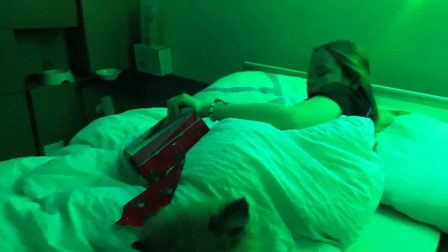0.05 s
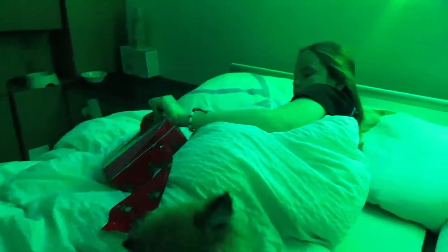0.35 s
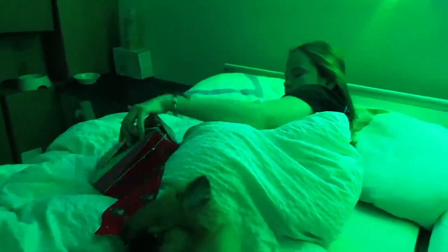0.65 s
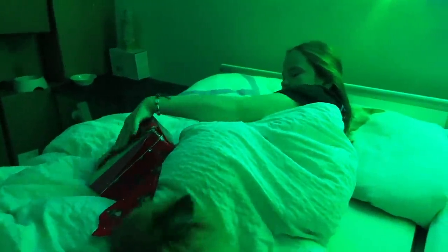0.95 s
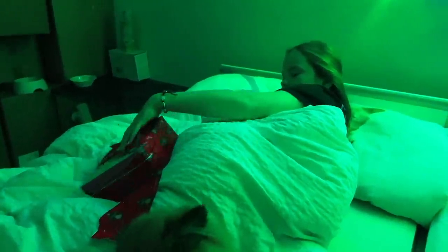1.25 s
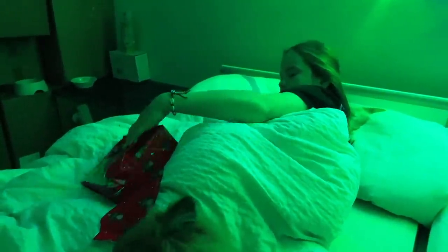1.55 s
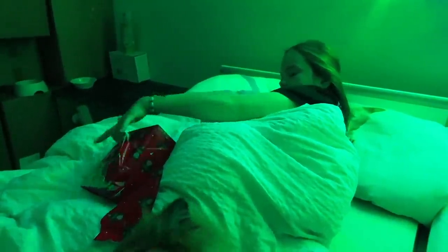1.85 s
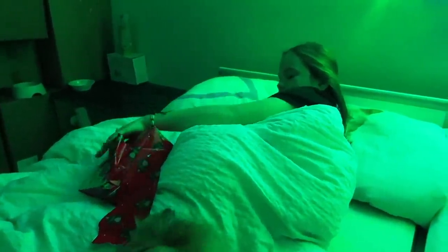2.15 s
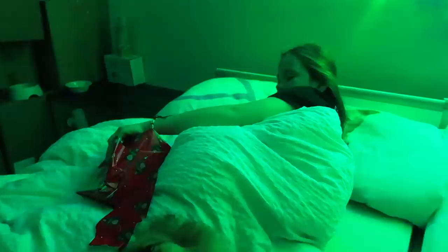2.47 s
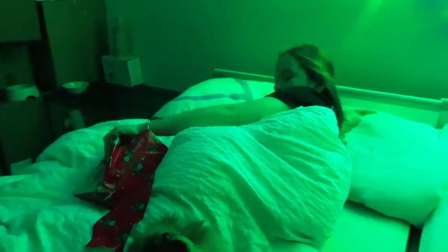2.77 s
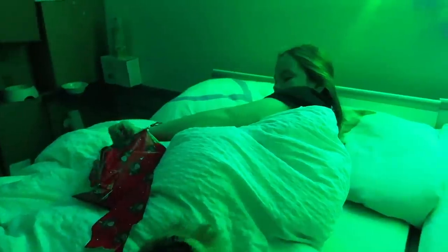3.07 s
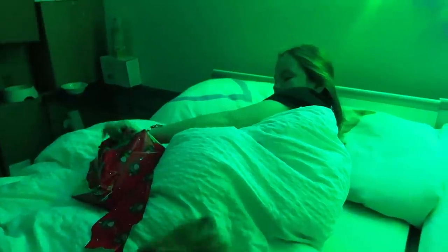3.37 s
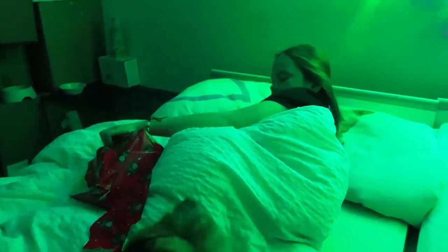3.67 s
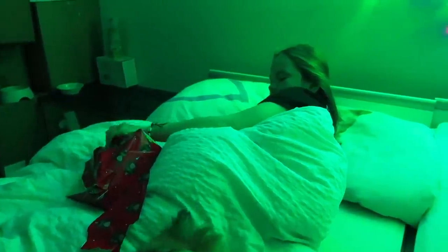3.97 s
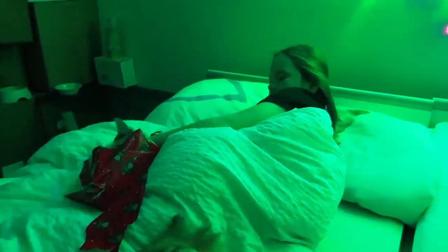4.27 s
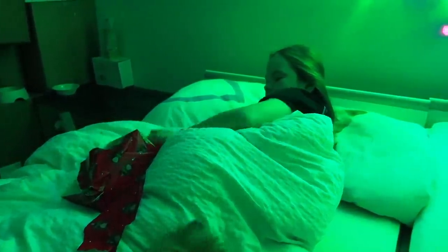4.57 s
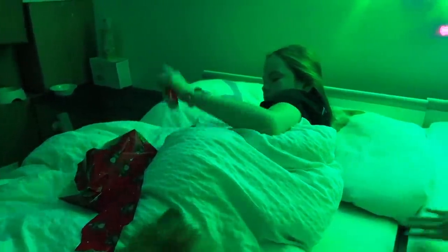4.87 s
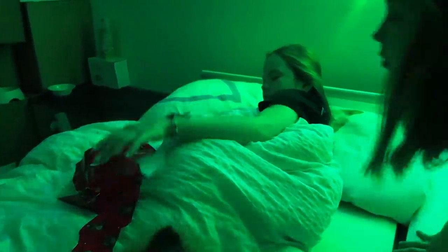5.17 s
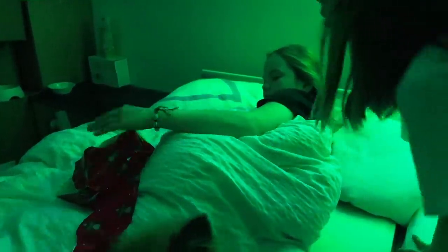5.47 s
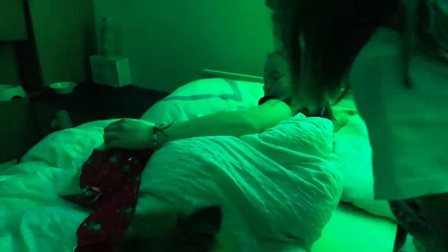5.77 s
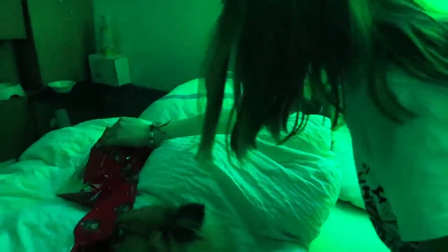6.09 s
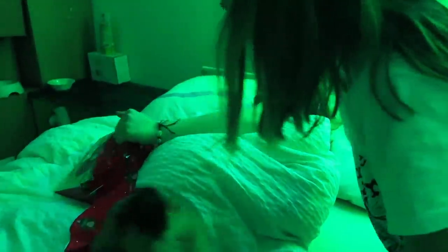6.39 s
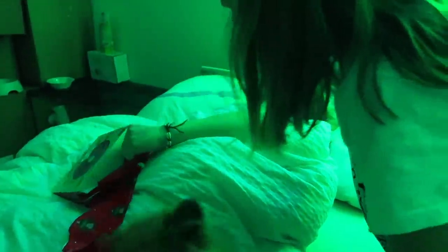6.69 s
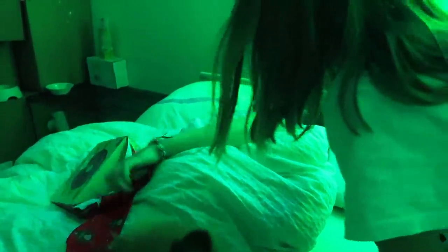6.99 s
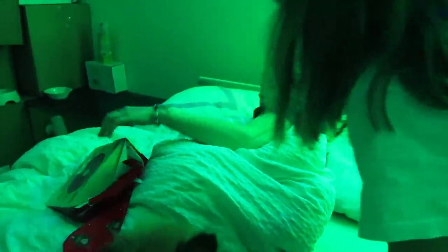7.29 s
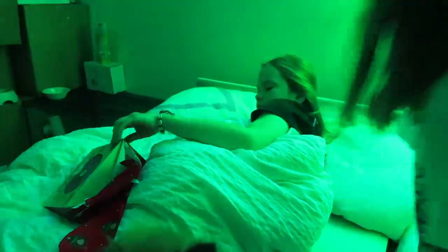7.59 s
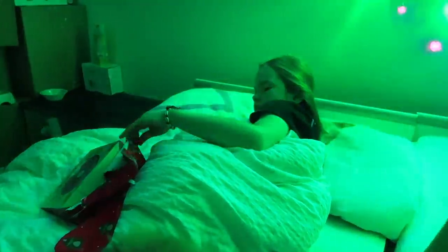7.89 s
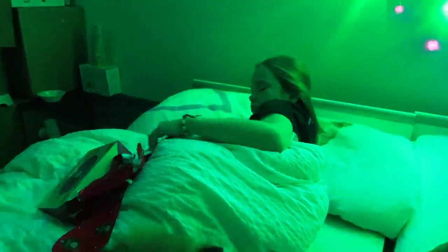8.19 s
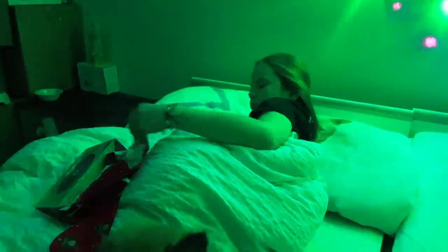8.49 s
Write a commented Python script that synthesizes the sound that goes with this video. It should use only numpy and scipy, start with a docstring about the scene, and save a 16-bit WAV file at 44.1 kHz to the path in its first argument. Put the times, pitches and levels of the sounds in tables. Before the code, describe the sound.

Someone unwraps a gift indoors, the paper tearing, crinkling and snapping in fits, with light cardboard knocks and softly shifting bedding.

```python
"""A bare-walled room, a cardboard gift box on the bed, a small stereo microphone a couple of metres off.
Wrapping paper is torn from the box: fibres break in dense crackles and sudden rips, and creases snap.
Fingers bump, scuff and drag over the hollow box, which rings, rumbles and groans.
The bedding shifts softly, and a quiet hiss lies under it all."""
import sys
import numpy as np
from scipy import signal
from scipy.fft import rfft, irfft, next_fast_len
from scipy.io import wavfile
from scipy.ndimage import uniform_filter1d

SR = 44100
rng = np.random.default_rng(int(sys.argv[2]) if len(sys.argv) > 2 else 0)


def bounce(signal):
    """Save signal as a 16-bit WAV file at the path given by the first command-line argument."""
    frames = np.transpose(np.atleast_2d(signal))
    limited = np.clip(frames, -1, 1)
    pcm = np.round(limited * 32767).astype(np.int16)
    wavfile.write(sys.argv[1], SR, pcm)


N = 381465
TIME = np.arange(N) / SR

# the hand pulls or crumples the paper; a slack sheet has more low mids, a taut one more treble:
# (start [s], length [s], relative level [dB], swell [dB], low-mid weight [dB], treble weight [dB])
PULLS = [(0.0, .012, -36.5, -8, 0, -7), (0.088, 0.046, -28, -16, -1.5, 3.5),
         (0.187, 0.024, -31, -3.5, -16, -1), (0.25, 0.21, -40.5, -7.5, -4.5, -3.5),
         (0.529, 0.1, -45.5, 1, -5, -12), (0.73, 0.18, -54, -0.5, -9, -9), (0.912, 0.062, -49, 7, -2, -2.5),
         (1.128, 0.18, -39.5, -5, -11, -4.5), (1.318, 0.18, -42, 5, -4.5, -7.5),
         (1.659, 0.042, -48, 2, -0.5, -6.5), (1.908, 0.4, -52, -0.5, -1.5, -9),
         (2.413, 0.21, -49, -4.5, -2.5, -6), (2.634, 0.2, -45.5, 4.5, -0.5, -4),
         (2.797, 0.049, -35.5, 13, -6.5, -2.5), (3.043, 0.041, -27, -10, -5, 1),
         (3.209, 0.1, -44, 2, -22, -3.5), (3.493, 0.045, -45, -5, -0.5, -11.5),
         (3.594, 0.14, -44, -7, -1.5, -13), (3.83, 0.11, -50.5, -1, -0.5, -14),
         (3.947, 0.13, -45.5, 1, -4, -6.5), (4.161, 0.22, -42.5, 7.5, -14, -5),
         (4.335, 0.17, -33.5, 0.5, -2.5, -2.5), (4.533, 0.12, -31, -5.5, -4.5, -5.5),
         (4.789, 0.016, -50.5, -4, 2, -5), (5.206, 0.27, -56.5, 1.5, -9, -5.5),
         (5.526, 0.2, -54.5, -0.5, -4, -8), (5.73, 0.11, -56.5, -1, 4, 3.5),
         (5.836, 0.031, -42, 5, -1.5, -6), (5.919, 0.13, -40.5, -1, -6, -6.5),
         (6.099, 0.21, -39, -4.5, -5.5, -10), (6.325, 0.115, -36.5, 3.5, -3, -7),
         (6.499, 0.28, -37, -5.5, -4, -6.5), (6.805, .17, -40.5, -0.5, 0.5, -5),
         (7.06, 0.086, -59.5, 1, 0, -2.5), (7.532, 0.025, -51.5, 2, -1, -20),
         (7.763, 0.048, -41.5, -10.5, -5, -8), (7.859, 0.058, -44.5, 1, -1, -9.5),
         (7.966, 0.059, -46.5, -1.5, -4.5, -13), (8.104, 0.16, -33, -5, -2.5, -3),
         (8.344, 0.12, -56, 4, 1, -19), (8.461, 0.087, -47, 3.5, -3.5, -15),
         (8.585, .07, -50.5, 0, -8, -23)]
# spectrum of the paper: (frequency [Hz], gain [dB])
PAPER_COLOUR = [(47, -58), (80, -24.5), (119, 3), (199, 1), (361, -4), (404, 0), (687, -4.5), (734, -2),
                (1050, -5.5), (1140, -6), (1500, -6), (3030, -5.5), (11200, -21.5), (14600, -35),
                (16000, -72)]
# resonances of the hollow box: (frequency [Hz], width [Hz], gain [dB])
BOX_MODES = [(200, 28, -0.5), (287, 42, 4.5), (426, 25, 7), (530, 42, 3.5), (603, 28, 3.5), (740, 32, 3),
             (953, 68, -2), (1250, 37, -2), (1280, 28, -3)]


def from_db(db):
    """Decibels to gain."""
    return np.exp(np.asarray(db) * (np.log(10) / 20))


def rms_one(x):
    """Scale to unit power."""
    return x / np.sqrt(np.mean(x ** 2) + 1e-20)


def even(x, window_s):
    """Hold the short-term power at 1 and keep the grain."""
    x = rms_one(x)
    return x / np.sqrt(np.abs(uniform_filter1d(x ** 2, max(int(window_s * SR), 2))) + 1e-9)


def in_time(rows):
    """The columns of a curve table at every sample."""
    times, *columns = np.transpose(rows)
    return [np.interp(TIME, times, column) for column in columns]


def at_hz(points, hz):
    """Read a table on a log-frequency axis."""
    known, values = np.transpose(points)
    return np.interp(np.log(np.maximum(hz, 1)), np.log(known), values)


def band(x, edges_hz, kind, order=2):
    """Butterworth filter."""
    sos = signal.butter(order, np.clip(edges_hz, 10, SR * 9 / 20), kind, fs=SR, output="sos")
    return signal.sosfilt(sos, x + 1e-18)


def colour(x, spectrum, size=2048):
    """Causal (minimum-phase) filter with the given spectrum."""
    gains = from_db(at_hz(spectrum, np.fft.rfftfreq(size, 1 / SR)))
    cepstrum = irfft(np.log(gains))
    response = irfft(np.exp(rfft(np.r_[cepstrum[0], 2 * cepstrum[1:size // 2]], size)))
    return signal.oaconvolve(x, response)[:len(x)]


def resonance(x, hz, width_hz):
    """Two-pole resonance with gain 1 on top."""
    r = np.exp(-np.pi * width_hz / SR)
    feedback = [1, -2 * r * np.cos(2 * np.pi * hz / SR), r * r]
    return signal.lfilter(np.array([1, 0, -1]) * (1 - r * r) / 2, feedback, x + 1e-18)


def add(out, start_s, sound):
    """Mix a short sound in at a time."""
    start = max(int(start_s * SR), 0)
    out[start:start + len(sound)] += sound[:N - start]


def drift(per_s):
    """Random wander of spread 1."""
    knots = rng.standard_normal(int(per_s * N / SR) + 2)
    return rms_one(np.interp(TIME * per_s, np.arange(len(knots)), knots))


def clicks(per_s, spread_db):
    """Random clicks, many small and a few large."""
    sizes = from_db(spread_db * np.minimum(rng.exponential(1, N), 4)) * rng.choice([-1, 1], N)
    return sizes * (rng.random(N) < per_s / SR)


def movements(rows, attack_db_per_s, release_db_per_s, rest_db):
    """Level in dB of movements over a resting level: each builds up, swells or fades, then dies away."""
    power, ticks = from_db(rest_db) ** 2, TIME[::64]
    for start, length, level_db, swell_db in rows:
        age = ticks - start
        edges_db = attack_db_per_s * np.maximum(-age, 0) + release_db_per_s * np.maximum(age - length, 0)
        power = power + from_db(level_db + swell_db * np.clip(age / length, 0, 1) - edges_db) ** 2
    return np.interp(TIME, ticks, 10 * np.log10(power))


def pulling(weights_db=0, settling_db=-66):
    """Level in dB of the paper: softly gripped, then pulled, and settling between pulls."""
    grip_s, grip_db = 0.034, -17
    starts, lengths, levels_db, swells_db, *_ = np.transpose(PULLS)
    pulls = list(zip(starts, lengths, levels_db + weights_db, swells_db))
    grips = [(start - grip_s, grip_s, db + grip_db, 0) for start, _, db, _ in pulls]
    return movements(pulls + grips, attack_db_per_s=695, release_db_per_s=348, rest_db=settling_db)


def crackle(per_s, spread_db, facet_db, patchy_db, count=14):
    """Each breaking fibre clicks and briefly rings one facet; facets come and go as the sheet flexes."""
    breaks, facet_of_break = clicks(per_s, spread_db), rng.integers(0, count, N)
    facets = np.zeros(N)
    for k, hz in enumerate(np.geomspace(650, 11000, count)):
        ring = rms_one(resonance(breaks * (facet_of_break == k), hz, 0.25 * hz))
        facets += ring * np.sqrt(hz) * from_db(patchy_db * drift(per_s=16))
    grain = rms_one(breaks) + from_db(facet_db) * rms_one(facets)
    return even(colour(grain, PAPER_COLOUR), window_s=0.036)


def paper():
    """Harder pulling breaks more fibres a second; slack paper sounds dull, taut paper bright."""
    *_, low_weights, treble_weights = np.transpose(PULLS)
    level_db = pulling()
    low_db = pulling(low_weights, settling_db=-65.5)
    treble_db = pulling(treble_weights, settling_db=-69)
    breaks_per_s = 850 * from_db(0.3 * (level_db + 40))
    grain = crackle(breaks_per_s, spread_db=3.5, facet_db=-0.5, patchy_db=2.0)
    sliding = rms_one(colour(rng.standard_normal(N), PAPER_COLOUR))   # sheet hisses over sheet
    low = from_db(low_db) * rms_one(band(band(grain, 1120, "low", order=3), 97, "high"))
    mid = from_db(level_db - 2.0) * rms_one(band(grain, [1300, 5000], "band", order=3))
    treble = from_db(treble_db) * rms_one(band(grain + from_db(-2.5) * sliding, 4820, "high", order=3))
    catching = rms_one(from_db(2.4 * drift(per_s=110)))   # the tear catches and lets go in spurts
    return catching * (low + mid) + treble


def sheet_ring(x, flex_db=2.0):
    """A few papery resonances stand out of the crackle; they come and go as the sheet bends."""
    # resonances of the sheet on its box: (frequency [Hz], width [Hz], gain [dB])
    sheet_modes = [(745, 16, -11), (1170, 13, -11), (2140, 77, -3), (2573, 49, -5), (2750, 23, -23),
                   (3020, 35, -10), (3420, 55, -4), (3700, 50, -13)]
    return x + sum(from_db(db + flex_db * drift(per_s=12)) * resonance(x, hz, width)
                   for hz, width, db in sheet_modes)


def cardboard(x, modes):
    """Resonances of the hollow box, in parallel with alternating signs."""
    return sum((-1) ** k * from_db(db) * resonance(x, hz, width)
               for k, (hz, width, db) in enumerate(modes))


def tugs():
    """The paper tugs at the box, whose large panels rumble along."""
    # large panels, damped by the bed: (frequency [Hz], width [Hz], gain [dB])
    panel_modes = [(107.3, 9.4, -3.5), (131, 23, -4.5), (195.4, 13, -2), (299, 37, -13.5)]
    level_db = 1.01 * (pulling() + 31.5) - 44.5
    rumble = cardboard(clicks(per_s=500, spread_db=1.5), panel_modes)
    return from_db(level_db) * even(rumble, window_s=0.043)


def bedding():
    """Cloth rubs on cloth with a soft, dull rustle."""
    # arm and body shift the bedding: (start [s], length [s], relative level [dB], swell [dB])
    shifts = [(0.0, 0.018, -33, -15), (0.085, 0.054, -30, -9.5), (0.84, 0.2, -48, 0), (1.3, 0.2, -41, 8.5),
              (2.02, 0.64, -44.5, -4.5), (2.68, 0.36, -48.5, 9), (3.96, 0.71, -48, 5),
              (5.33, 0.74, -55, 9.5), (6.42, 0.6, -56, 6), (8.088, 0.19, -36.5, -8.5)]
    # spectrum of the cloth: (frequency [Hz], gain [dB])
    cloth_colour = [(35, -31), (60, -13), (120, 0), (190, 3.5), (263, -5), (334, 0.5), (400, -1), (525, 1),
                    (1200, -20.5), (1560, -30), (2640, -120)]
    level_db = movements(shifts, attack_db_per_s=398, release_db_per_s=131, rest_db=-58)
    rustle = colour(clicks(per_s=1500, spread_db=4.5), cloth_colour)
    return from_db(level_db - 1.0) * rms_one(rustle)


def snaps(gain_db, size=1024):
    """A crease flips with a sharp crack and the short ring of its facet; smaller aftershocks follow."""
    # snapping creases: (time [s], relative peak [dB], facet pitch [Hz], crack weight [dB])
    creases = [(0.036, -24, 5090, 3), (0.071, -9.5, 5750, -4), (0.1903, -23, 3400, -6),
               (0.198, -27, 2500, -8), (0.279, -34, 2300, -8), (0.562, -31, 1950, -16),
               (0.904, -34, 3790, -17), (0.911, -28, 2000, -3), (0.9433, -25, 4300, 5),
               (0.95, -23.5, 4130, -17), (0.969, -28, 5200, -10), (1.055, -30, 3670, 1),
               (1.114, -25.5, 1850, -14.5), (1.1345, -22, 3580, 5), (1.204, -27.5, 3300, -9),
               (1.232, -28, 1360, -17), (1.235, -30.5, 5200, -19), (1.238, -29, 1400, -12),
               (1.33, -30, 2030, -10), (1.425, -23, 3520, -23), (1.792, -30, 3560, -9),
               (1.973, -34, 2730, -11), (2.355, -34, 1780, -34), (2.382, -33.5, 2640, -26),
               (2.4133, -25.5, 4160, -20), (2.6316, -29, 3150, -3), (2.478, -33, 4900, -21),
               (2.7478, -26.5, 2550, -20), (2.7686, -17.5, 3560, -6), (2.8503, -16, 3140, -1),
               (2.855, -24, 2690, -4), (3.029, -24, 3550, -4), (3.0351, -11, 2130, 11),
               (3.228, -28, 1890, -15), (3.235, -24, 4970, -2), (3.615, -33, 2490, -15),
               (3.9297, -32, 3570, -7), (3.9554, -25.5, 2780, -10), (4.1777, -16, 2640, -2),
               (4.184, -25, 4030, -20), (4.343, -19, 3870, -6), (4.348, -17.5, 4200, 4),
               (4.386, -25, 3000, -10), (4.394, -25, 3100, -14), (4.455, -23, 3490, -12),
               (4.4764, -26, 3700, -10), (4.5378, -21.5, 1720, -6), (4.789, -33, 2500, -28),
               (5.0494, -40, 5330, -9), (5.228, -38.5, 3500, -10), (5.7254, -27.5, 2300, 3),
               (5.961, -28.5, 3800, -8), (5.978, -32, 6500, -3), (6.1402, -30, 3100, -12),
               (6.162, -28.5, 1700, -8), (6.231, -30, 1900, -14), (6.2685, -29, 1770, -17),
               (6.3055, -23, 3400, -11), (6.313, -29, 990, -15), (6.363, -35, 1900, -11),
               (6.413, -23, 1480, -6), (6.437, -32, 1400, -8), (6.548, -23, 2100, -11),
               (6.556, -31, 1950, -10), (6.5667, -21, 1920, -20), (6.58, -30, 3300, -21),
               (6.616, -32, 2070, -20), (6.641, -25.5, 3440, -14), (6.659, -24, 3180, -14),
               (6.68, -23.5, 3080, -13), (6.685, -28, 3500, -8), (6.7196, -20.5, 2860, -12),
               (6.767, -24, 3300, -7), (6.77, -22, 3380, -13), (6.786, -26, 3420, -15),
               (6.823, -22.5, 3380, -9), (6.83, -27, 3400, -6), (6.859, -27.5, 3500, -20),
               (6.8868, -20, 2630, -27), (6.9105, -23.5, 1370, -26), (6.92, -31, 1400, -25),
               (6.972, -22.5, 3000, -8), (6.9843, -26, 3270, -6), (7.536, -35.5, 1940, -23),
               (7.7585, -30, 4130, -1), (7.765, -28, 4930, -9), (7.861, -25, 3240, -28),
               (8.017, -42, 3000, -17), (8.068, -32, 2410, -18), (8.0984, -21, 3040, -10),
               (8.112, -22, 2900, -10), (8.137, -19, 2150, -13), (8.1708, -23, 2490, -4),
               (8.2569, -22.5, 2160, -3), (8.358, -36.5, 2840, -16), (8.531, -32, 4220, -8)]
    shocks_per_s, shock_db, shock_decay_s = 700, -10, 0.012
    out, age = np.zeros(N), TIME[:size]
    for start, peak_db, hz, crack_db in creases:
        flutter, chance = rng.uniform(-1, 1, (2, size))
        shocks = np.sign(flutter) * (np.abs(chance) < shocks_per_s / SR) * np.exp(-age / shock_decay_s)
        flip = (age == 0) + 0.45 * flutter * np.exp(-age / 0.0012) + from_db(shock_db) * shocks
        width_hz = 0.42 * hz
        facet = resonance(resonance(flip, hz, width_hz), hz, width_hz)
        crack = band(band(flip, [800, 7000], "band", order=1), 11200, "low")
        snap = facet + from_db(crack_db) * crack
        add(out, start + 0.0005, from_db(peak_db + gain_db) * snap / np.abs(snap).max())
    return out


def bumps(panel_gain_db, tap_gain_db, size=8192):
    """A fingertip taps sharply, knocks the whole box and sets one panel thumping."""
    # fingers bump the box:
    # (time [s], relative panel level [dB], pitch [Hz], ring t60 [s], relative tap peak [dB])
    knocks = [(0.071, -21, 740, 0.018, -30), (0.591, -44, 930, 0.04, -33), (1.2317, -27, 200, .03, -25),
              (1.331, -33, 520, .04, -26), (1.495, -23, 530, 0.057, -47), (1.635, -37, 758, 0.13, -34),
              (1.676, -24.5, 166, 0.032, -40), (2.232, -18.5, 138, 0.068, -38),
              (2.235, -27.5, 423, .05, -48), (2.521, -22.5, 602, 0.035, -44), (2.539, -28, 583, 0.044, -32),
              (2.561, -24.5, 550, 0.045, -34.5), (2.575, -32, 655, 0.05, -38), (2.598, -32, 557, 0.1, -39),
              (3.036, -26, 769, 0.07, -50), (4.059, -19, 137, 0.042, -50), (4.856, -27, 610, 0.011, -35.5),
              (5.3147, -23.5, 250, 0.016, -32.5), (5.314, -33, 490, 0.022, -42),
              (5.5963, -23, 109, 0.089, -32), (5.598, -33, 469, 0.084, -42), (5.601, -21, 196, 0.097, -39),
              (5.622, -31, 196, 0.047, -36), (5.831, -33, 131, 0.049, -28.5),
              (5.861, -33, 783, 0.074, -25.5), (6.04, -29, 432, .03, -35), (6.228, -32, 126, 0.044, -33.5),
              (8.09, -26, 330, 0.051, -45), (8.125, -30, 303, 0.094, -45)]
    out, age = np.zeros(N), TIME[:size]
    for start, panel_db, hz, t60, tap_db in knocks:
        beating_modes = np.sin(2 * np.pi * hz * age) + 0.18 * np.sin(2 * np.pi * 1.3 * hz * age)
        panel = beating_modes * from_db(-60 * age / t60) * (1 - np.exp(-2 * hz * age))
        touch = (age == 0) + 0.059 * rng.standard_normal(size) * np.exp(-age / 0.0054)
        tap = band(touch, [300, 1700], "band") + 1.2 * cardboard(touch, BOX_MODES)
        add(out, start, from_db(panel_db + panel_gain_db) * panel)
        add(out, start, from_db(tap_db + tap_gain_db) * tap / np.abs(tap).max())
    return band(out, 102, "high", order=3)


def scuffs(attack_s=0.0024, release_s=0.0089):
    """A fingertip skids in a short run of slips that ring the lid."""
    # skids on the lid: (start [s], length [s], level [dB])
    skids = [(0.075, 0.02, -28.5), (0.591, .013, -36), (0.615, 0.022, -45.5), (0.702, 0.016, -44.5),
             (0.737, .012, -52), (1.442, 0.015, -37), (1.967, 0.026, -51), (2.834, 0.041, -37),
             (3.042, 0.028, -36), (4.037, 0.056, -47), (8.067, .05, -41.5)]
    # resonances of the lid: (frequency [Hz], width [Hz], gain [dB])
    lid_modes = [(450, 110, -6.5), (723, 69, 1), (942, 99, 1), (1143, 110, -3), (1290, 120, -4)]
    out = np.zeros(N)
    slips = even(cardboard(clicks(per_s=700, spread_db=0.5), lid_modes), window_s=0.0205)
    for start, length, level_db in skids:
        age = TIME[:int((length + release_s) * SR)]
        contact = np.interp(age, [0, attack_s, length, age[-1]], [0, 1, 1, 0])
        add(out, start, from_db(level_db) * contact * slips[int(start * SR):][:len(age)])
    return out


def rips(attack_s=0.001, release_s=0.01):
    """The tear runs ahead in a sudden volley of breaking fibres and rings the freed flap."""
    # sudden rips: (start [s], length [s], level [dB], flap resonance [Hz])
    tears = [(0.077, 0.014, -24.5, 5800), (0.096, 0.012, -24, 2750), (0.181, 0.015, -33, 2340),
             (0.184, 0.018, -27.5, 3500), (2.832, 0.015, -29, 2360), (2.847, 0.016, -25.5, 5730),
             (3.042, 0.03, -31.5, 2140), (3.259, 0.04, -45, 3060), (3.261, 0.059, -38, 2150),
             (3.61, 0.029, -45, 2400), (4.333, 0.038, -36, 4050), (4.383, 0.014, -28.5, 3030),
             (4.444, 0.016, -30, 3500), (4.536, 0.027, -32, 3260), (4.628, .025, -41, 1820),
             (5.53, 0.025, -48, 2050), (6.302, 0.06, -36, 1150), (6.404, 0.049, -36.5, 1390),
             (6.507, 0.025, -32.5, 1500), (6.537, 0.044, -35, 1800), (8.086, 0.09, -33, 2930)]
    out = np.zeros(N)
    volley = crackle(per_s=2200, spread_db=4.5, facet_db=1.5, patchy_db=4.0)
    for start, length, level_db, hz in tears:
        age = TIME[:int((length + release_s) * SR)]
        fibres = volley[int(start * SR):][:len(age)]
        flap = rms_one(fibres + 2.4 * resonance(fibres, hz, 0.25 * hz))
        envelope = np.interp(age, [0, attack_s, length, age[-1]], [0, 1, 1, 0])
        add(out, start, from_db(level_db) * flap * envelope)
    return out


def drag():
    """Skin sticks and slips on the box and sets it droning."""
    # fingers drag over the box: (time [s], relative level [dB])
    stroke = [(1.106, -52), (1.12, -35), (1.208, -37.5), (1.236, -32), (1.256, -35), (1.358, -28),
              (1.384, -36), (1.42, -27), (1.488, -28.5), (1.62, -74)]
    level_db, = in_time(stroke)
    touching = np.interp(TIME, [1.06, 1.1, 1.58, 1.64], [0, 1, 1, 0])
    drone = cardboard(clicks(per_s=450, spread_db=5.0), BOX_MODES)
    return touching * from_db(level_db - 5.0) * even(drone, window_s=0.03)


def groan():
    """Nearly regular slips make the box groan under the fingers."""
    # the slipping locks onto one wall of the box: (time [s], slip rate [1/s], level [dB])
    slipping = [(1.25, 290, -68), (1.28, 334, -40), (1.325, 285, -34.5), (1.355, 297, -27),
                (1.38, 310, -36), (1.42, 200, -38), (1.46, 240, -55), (1.5, 280, -80)]
    per_s, level_db = in_time(slipping)
    slip_count = np.cumsum(per_s * from_db(0.243 * drift(per_s=90))) / SR
    slips = np.diff(np.floor(slip_count), prepend=0) * from_db(2.0 * drift(per_s=120))
    slips = band(slips, 320, "low")   # soft skin rounds each slip
    return from_db(level_db) * even(cardboard(slips, BOX_MODES), window_s=0.03)


def room_tail(size=32768, bands=9):
    """Diffuse reflections off the bare walls die at a rate of their own in every band; unit energy."""
    # decay of the room: (frequency [Hz], t60 [s])
    room_t60 = [(150, 0.29), (500, 0.13), (1400, 0.61), (4000, 0.55), (12000, 0.19)]
    age, edges = TIME[:size], np.geomspace(60, 18000, bands + 1)
    tail = np.zeros(size)
    for low, high in zip(edges, edges[1:]):
        t60 = at_hz(room_t60, np.sqrt(low * high))
        tail += band(rng.standard_normal(size), [low, high], "band") * from_db(-60 * age / t60)
    tail *= np.clip(age / 0.0021, 0, 1) * (1 + 1.08 * np.exp(-age / 0.032))   # the near wall comes first
    return tail / np.sqrt(np.sum(tail ** 2))


def in_room(x, wet_db, side_direct_db, spots):
    """Direct sound and reflections, as the sum and the difference of the two microphone capsules."""
    wet, reflections = from_db(wet_db), np.zeros((2, N))
    spot = (TIME * 45).astype(int) % spots   # the sound hops between spots, each with its own reflections
    for k in range(spots):
        share = uniform_filter1d(1. * (spot == k), size=128)
        reflections += [signal.oaconvolve(x * share, room_tail())[:N] for _ in range(2)]
    direct = np.array([x, from_db(side_direct_db) * x])
    return (direct + wet * reflections) / np.hypot(1, wet)


def stereo(mid, across, width):
    """The closely spaced capsules hear left and right apart mainly in the treble, by phase."""
    size = next_fast_len(N + 2048)
    side_gain = from_db(at_hz(width, np.fft.rfftfreq(size, 1 / SR)))
    side = irfft(1j * rfft(across, size) * side_gain, size)[:N]
    return np.array([mid + side, mid - side])


def hiss(mid_db=-54):
    """A quiet, steady noise floor, wider in the treble than in the bass."""
    # spectrum of the hiss: (frequency [Hz], gain [dB])
    hiss_colour = [(12, -25), (20, 3), (50, 5.5), (113, 8), (607, -7), (678, -27), (738, -4), (2600, -10.5),
                   (5230, -15), (10200, -31), (12100, -29), (14300, -64), (16000, -87)]
    # stereo width of the hiss: (frequency [Hz], side minus mid [dB])
    hiss_width = [(60, -29), (150, -9.5), (380, 5), (950, -0.5), (2380, 0.5), (5980, -1), (15000, 4)]
    mid, across = [rms_one(colour(white, hiss_colour)) for white in rng.standard_normal((2, N))]
    return from_db(mid_db) * stereo(mid, across, hiss_width)


def scene():
    """Paper, box and bedding heard across the room, over a quiet hiss."""
    # stereo width of the microphone: (frequency [Hz], side gain [dB])
    microphone_width = [(60, -36), (200, -59), (380, -25), (700, -24), (1300, -25.5), (2400, -18),
                        (4400, -3), (8100, 2.5), (13000, 10)]
    tearing = in_room(sheet_ring(paper() + rips()), wet_db=0.0, side_direct_db=-10.0, spots=6)
    creases = in_room(snaps(gain_db=2.5), wet_db=-4.0, side_direct_db=-6.0, spots=2)
    knocks = in_room(bumps(panel_gain_db=2.0, tap_gain_db=3.5), wet_db=-9.0, side_direct_db=-3.0, spots=1)
    rubbing = drag() + scuffs() + groan() + tugs() + bedding()
    handling = in_room(rubbing, wet_db=-3.0, side_direct_db=-1.0, spots=1)
    mid, across = tearing + creases + knocks + handling
    return stereo(mid, across, microphone_width) + hiss()


def record(dry):
    """The camera that carries the microphone cuts the top of the treble."""
    cutoff_hz = 14800
    return signal.sosfilt(signal.ellip(10, 0.1, 80, cutoff_hz, fs=SR, output="sos"), dry)


dry = scene()
out = record(dry)
bounce(out)
```